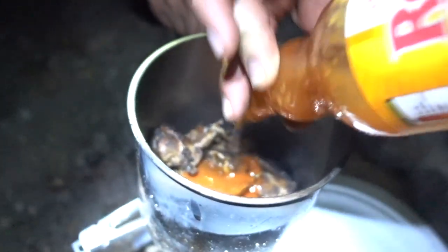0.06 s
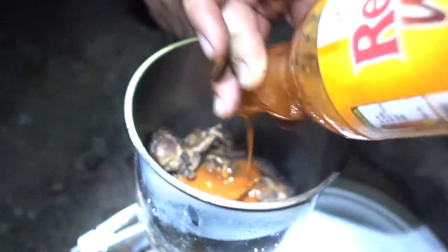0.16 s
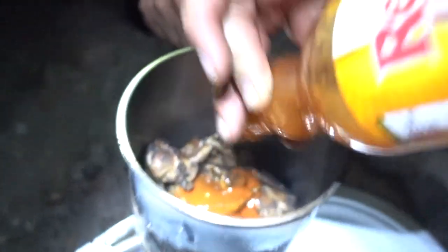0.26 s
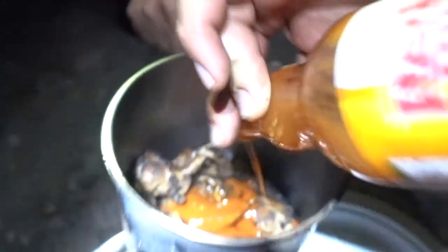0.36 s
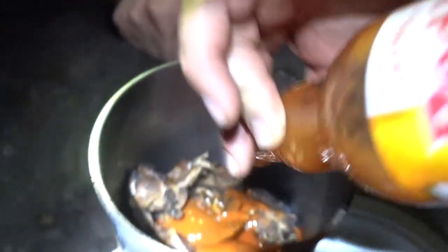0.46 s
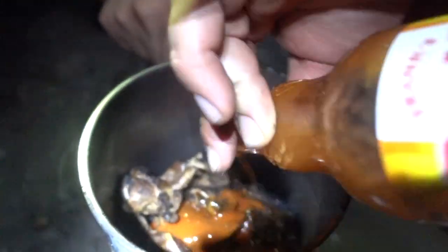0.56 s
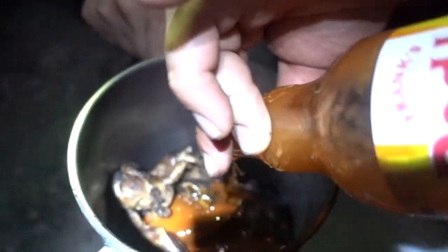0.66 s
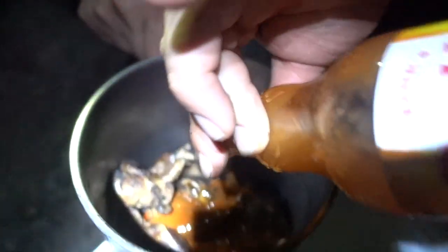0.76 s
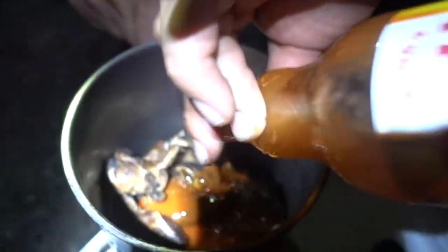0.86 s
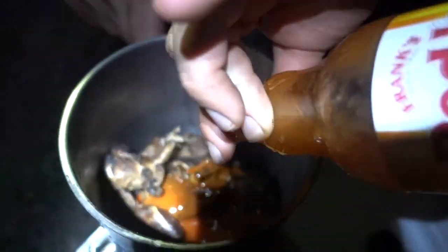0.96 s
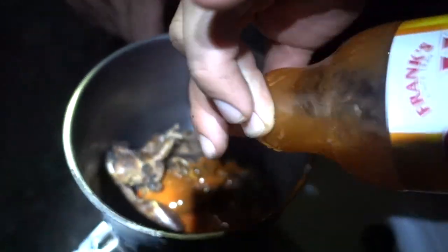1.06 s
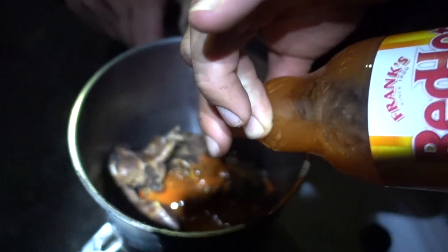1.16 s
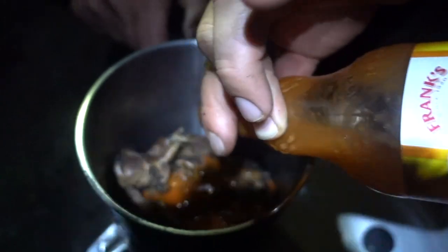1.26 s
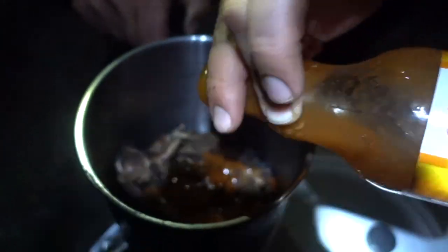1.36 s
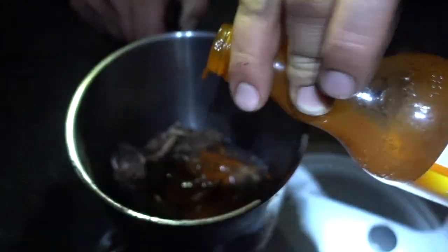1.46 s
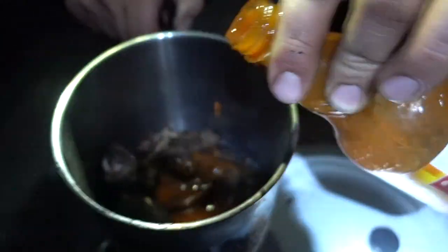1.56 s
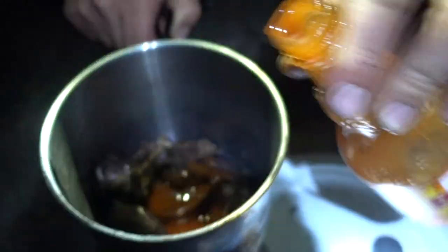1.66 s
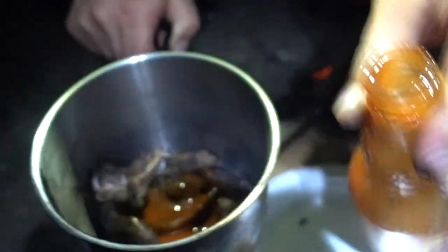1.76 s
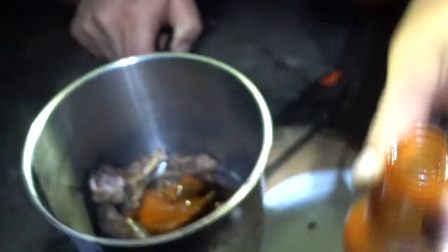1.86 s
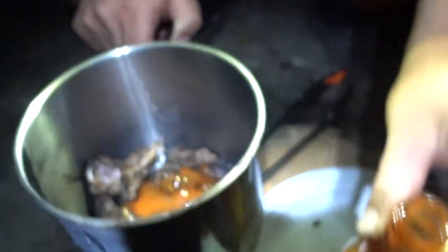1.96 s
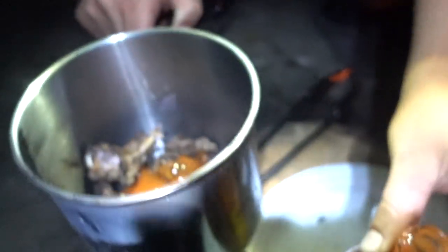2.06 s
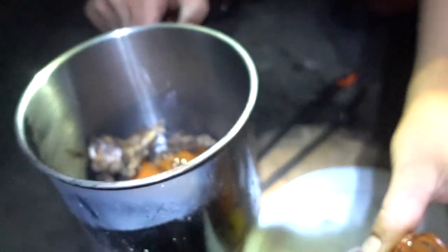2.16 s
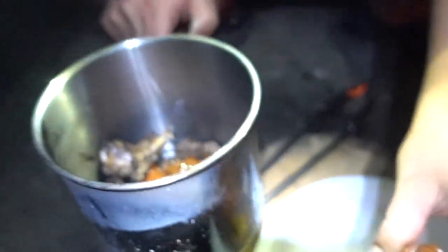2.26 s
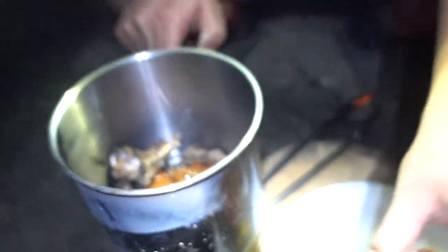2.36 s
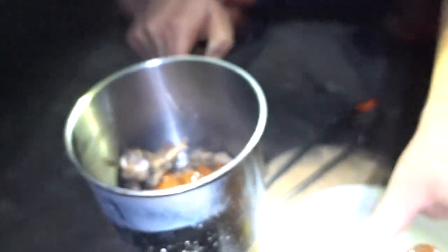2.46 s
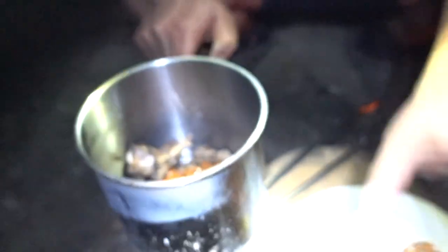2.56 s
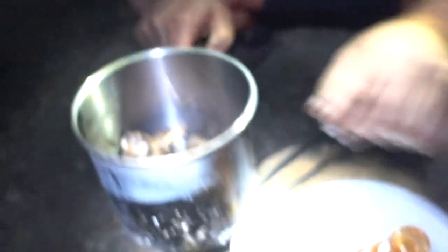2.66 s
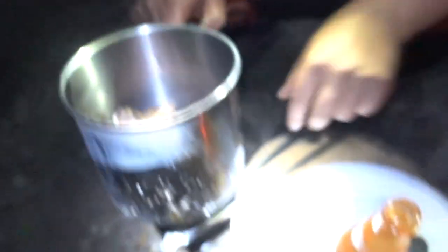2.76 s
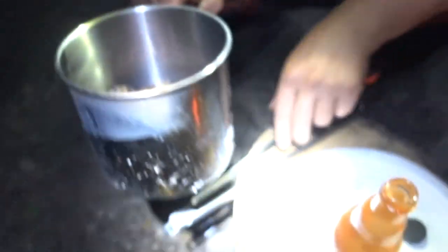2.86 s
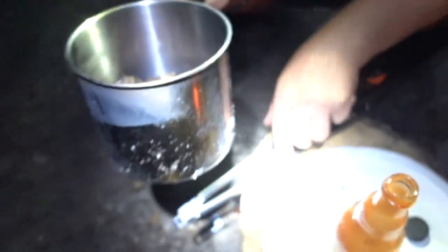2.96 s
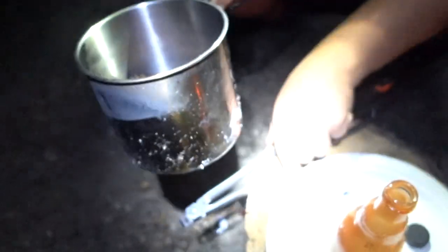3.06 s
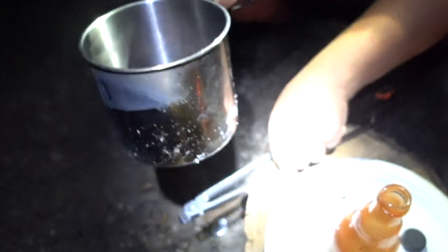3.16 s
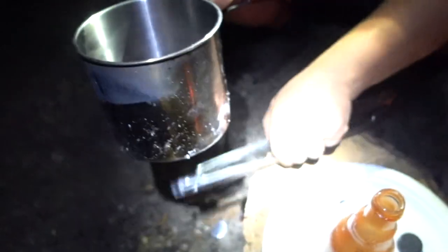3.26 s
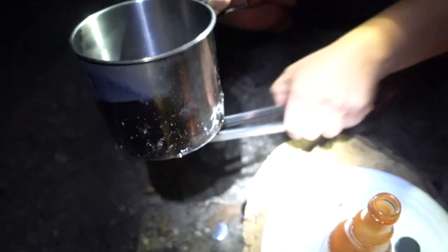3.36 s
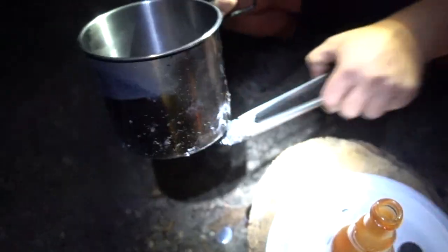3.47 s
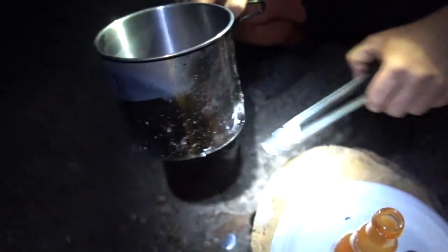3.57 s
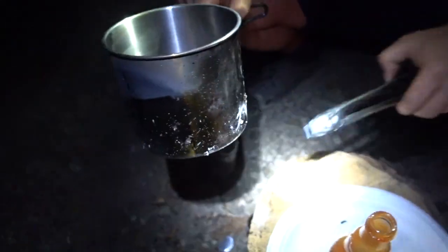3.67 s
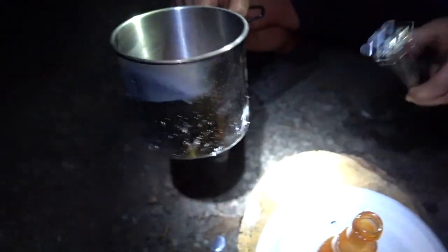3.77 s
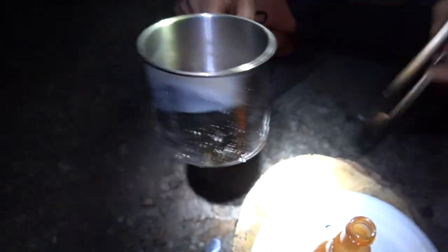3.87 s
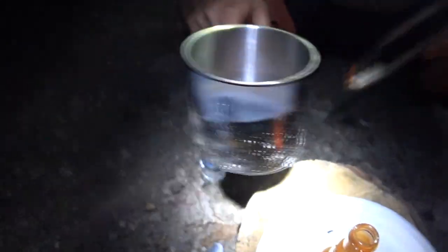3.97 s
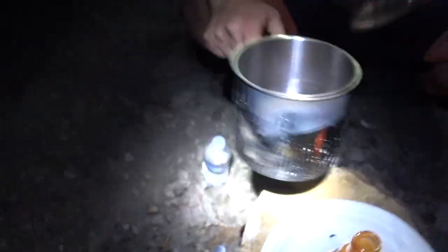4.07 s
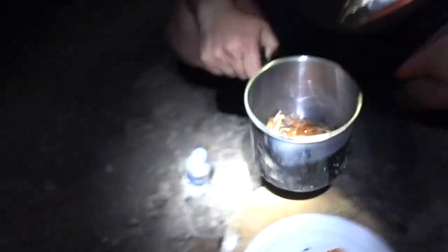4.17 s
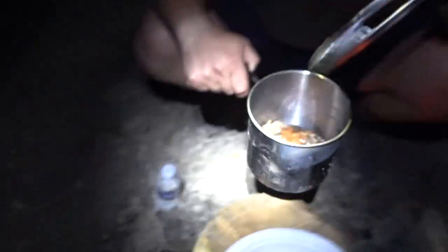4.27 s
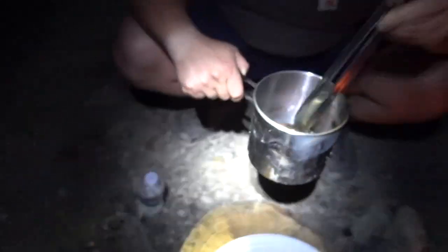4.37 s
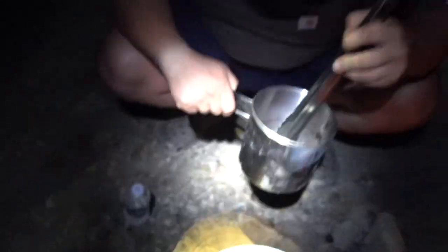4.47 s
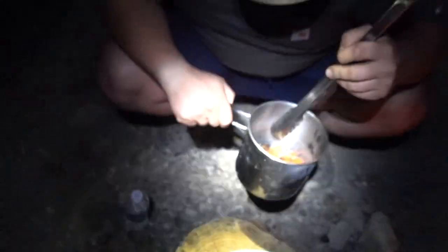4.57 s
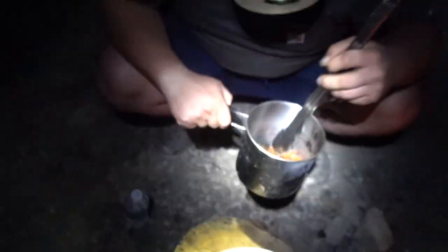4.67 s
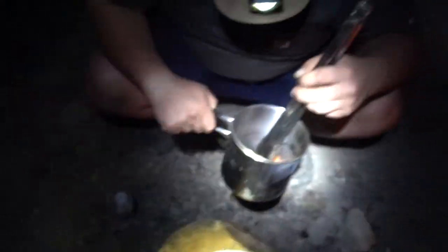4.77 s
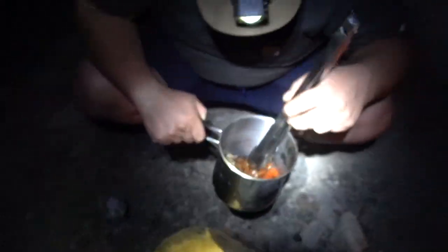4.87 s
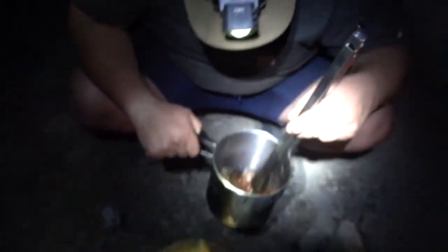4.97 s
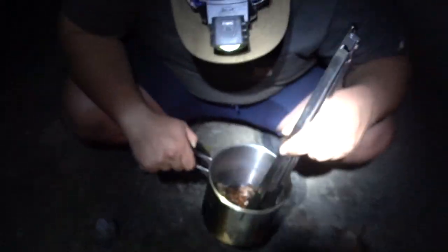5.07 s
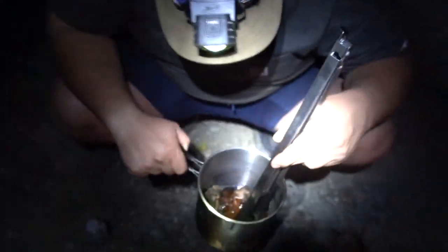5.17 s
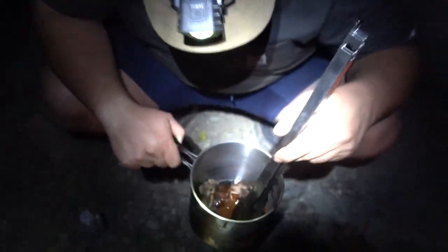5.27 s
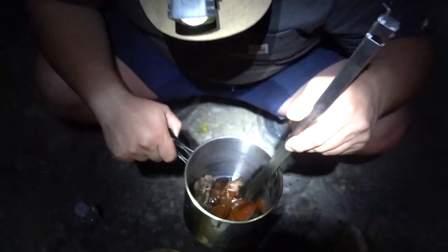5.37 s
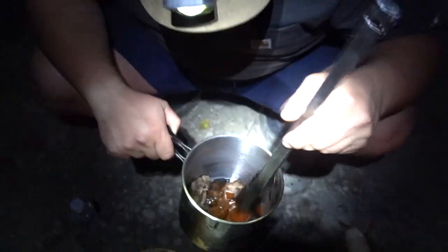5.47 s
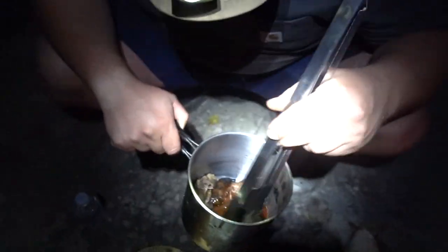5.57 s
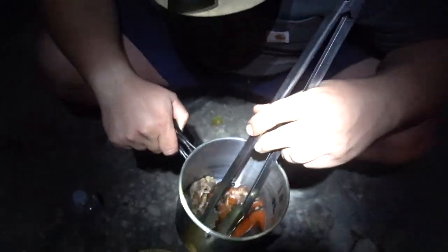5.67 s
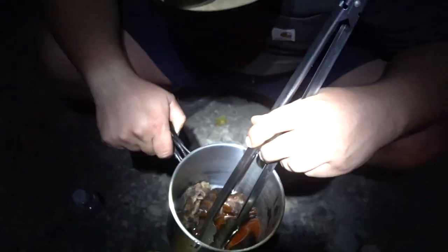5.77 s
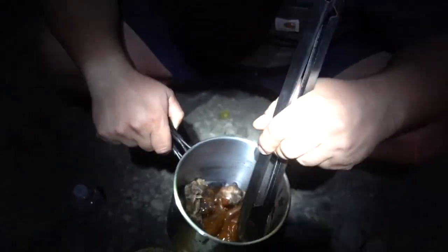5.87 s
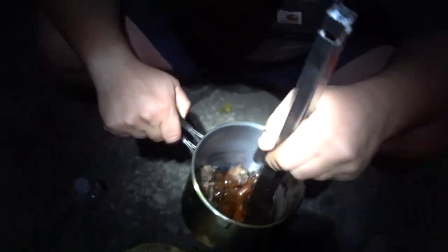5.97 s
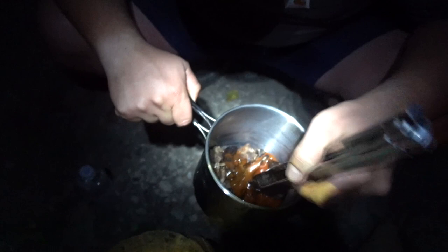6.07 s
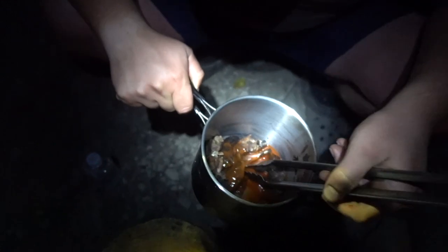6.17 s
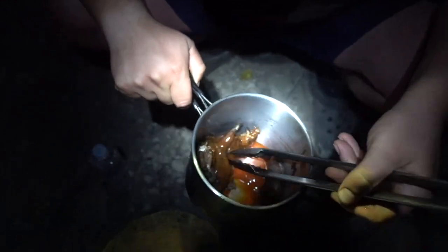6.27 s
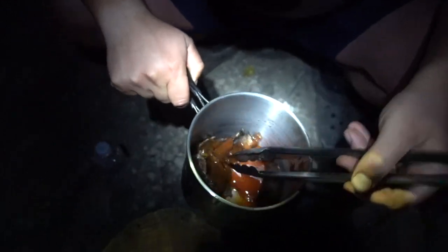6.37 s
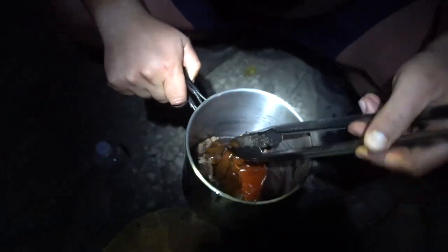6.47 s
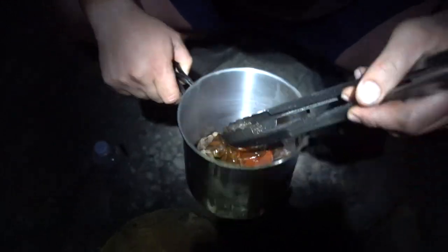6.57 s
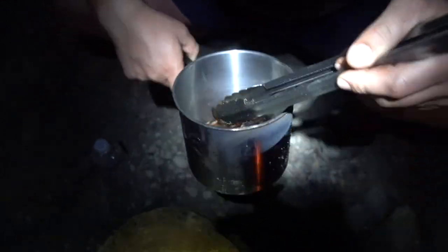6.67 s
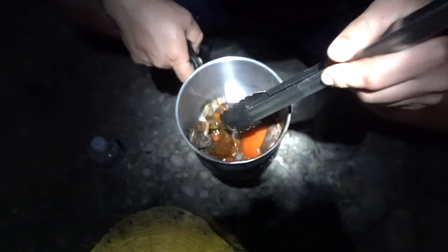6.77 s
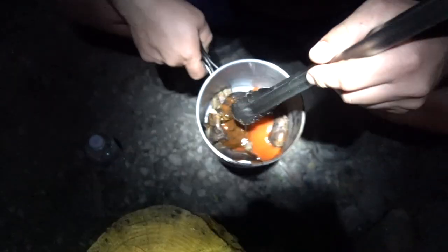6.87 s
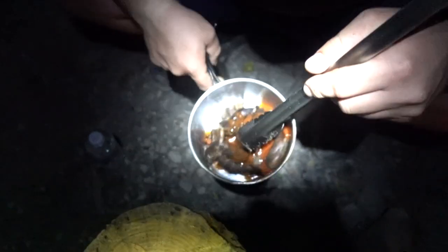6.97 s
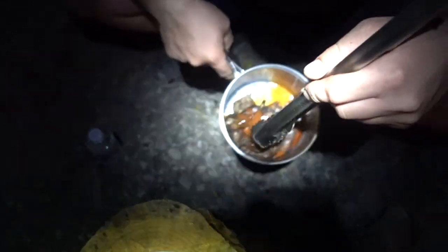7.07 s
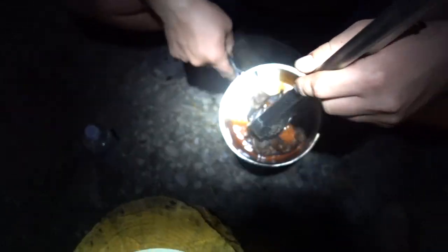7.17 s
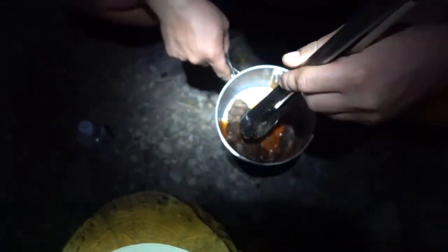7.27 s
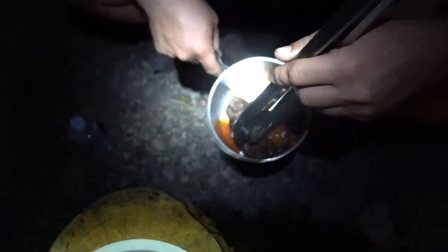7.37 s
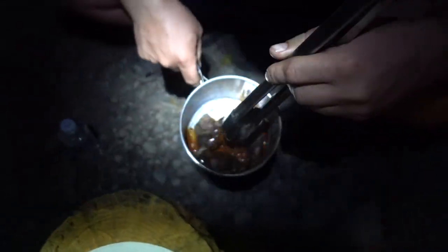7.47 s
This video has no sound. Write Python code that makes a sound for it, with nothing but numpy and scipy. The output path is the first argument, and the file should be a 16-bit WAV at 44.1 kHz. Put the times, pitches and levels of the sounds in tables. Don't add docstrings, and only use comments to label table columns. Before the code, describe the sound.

Crickets sing steadily at night as steel tongs knock, clink and scrape inside a small metal pot, with distant vehicles passing on a road.

```python
import sys
import numpy as np
from scipy import signal
from scipy.fft import rfft, irfft, next_fast_len
from scipy.io import wavfile
from scipy.ndimage import uniform_filter1d, map_coordinates

SR = 44100
rng = np.random.default_rng(int(sys.argv[2]) if len(sys.argv) > 2 else 0)


def how_loud(loudness_db):
    steps = np.asarray(loudness_db, float) / 20
    return 10 ** steps


def unload_audio(sound):
    columns = np.transpose(np.atleast_2d(sound))
    steps = np.round(np.clip(columns, -1, 1) * 32767)
    wavfile.write(sys.argv[1], SR, steps.astype(np.int16))


N = 331114


def along(points, hz):
    f, v = np.transpose(points)
    return np.interp(np.log(hz + 1), np.log(f + 1), v)


def unit(x):
    return x / np.sqrt(np.mean(x ** 2) + 1e-20)


def curves(rows):
    s, *columns = np.transpose(rows)
    return [np.interp(np.arange(N) / SR, s, column) for column in columns]


def sounding(rows):
    t = np.arange(N) / SR
    since_start = t - rows[0][0] + 0.01
    until_end = rows[-1][0] + 0.01 - t
    return np.clip(np.minimum(since_start, until_end) / 0.01, 0, 1)


def wobble(rate):
    steps = np.arange(0, N + 16, 16)
    knots = rng.standard_normal(int(N * rate / SR) + 4)
    return np.interp(np.arange(N), steps, map_coordinates(knots, [steps * rate / SR]))


def filtered(x, response):
    m = next_fast_len(N + SR // 2)
    return irfft(rfft(x, m) * response(np.fft.rfftfreq(m, 1 / SR)), m)[..., :N]


def resonant(x, peaks):
    def response(f):
        total = 0
        for k, (hz, width, db) in enumerate(peaks):
            total = total + (-1) ** k * how_loud(db) * 1j * f * width / (hz * hz - f * f + 1j * f * width)
        return total
    return filtered(x, response)


def rush(spectrum, patchy_db):
    z = signal.stft(rng.standard_normal((2, N)), nperseg=512)[2]
    field = uniform_filter1d(rng.standard_normal(z.shape[1:]), size=4, axis=0)
    field = uniform_filter1d(field, size=12, axis=1)
    pair = signal.istft(z * how_loud(patchy_db * unit(field)), nperseg=512)[1][:, :N]
    return unit(filtered(pair, lambda hz: how_loud(along(spectrum, hz))))


def grains(rate, spread_db, channels=1):
    shape = (channels, N)
    clicks = (rng.random(shape) < rate / SR) * rng.standard_normal(shape)
    return unit(clicks * how_loud(spread_db * rng.standard_normal(shape)))


def tone(rows, orders, rough, shake_db):
    hz, db = curves(rows)
    turns = 2 * np.pi * np.cumsum(hz) / SR
    wave = 0
    for multiple, level_db in orders:
        wave = wave + how_loud(level_db + shake_db * wobble(14)) * np.sin(multiple * turns + rough * wobble(40))
    return np.sqrt(2) * how_loud(db) * sounding(rows) * wave


def rings(rows, partner_hz, partner, rise, noisy):
    out = np.zeros(N + SR)
    t = np.arange(SR // 2) / SR
    for s, db, hz, t60, *held in rows:
        rattle = np.cumsum(0.05 * rng.standard_normal(len(t)))
        pair = np.sin(2 * np.pi * hz * t + rattle)
        pair = pair + partner * np.sin(2 * np.pi * (hz - partner_hz) * t)
        scratch = noisy * rng.standard_normal(len(t)) * how_loud(-60 * t / 0.001)
        grip = how_loud(-60 * np.clip(t - held[0], 0, 1) / 0.055) if held else 1
        fade = how_loud(db - 60 * t / max(t60, 0.003)) * (1 - np.exp(-t / rise))
        out[round(s * SR):][:len(t)] += fade * grip * (pair + scratch)
    return out[:N]


# pitch_hz, likeness_0_to_1
EAR_LIKENESS = [(60, 1.0), (150, 1), (380, 0.86), (950, 0.52), (2380, 0.62), (5980, 0), (15000, 0)]
# pitch_hz, left_minus_right_db
LEFT_TILT = [(60, 1), (180, 0.3), (550, 2.5), (1650, 3), (4970, 2.5), (15000, -0.5)]


def surround(pair):
    def turn(hz):
        return np.arccos(np.clip(along(EAR_LIKENESS, hz), 0, 1)) / 2
    mid, side = filtered(pair, lambda hz: np.array([np.cos(turn(hz)), np.sin(turn(hz))]))
    ears = np.array([mid + side, mid - side])
    return filtered(ears, lambda hz: how_loud(np.outer([0.5, -0.5], along(LEFT_TILT, hz))))


# pitch_hz, level_db
AIR_COLOUR = [(3600, -8), (4600, -17), (6400, -1), (7500, -4), (7800, -13.5), (12000, -11), (13300, -27),
              (15500, -53)]


def air():
    return surround(how_loud(-55.5) * rush(AIR_COLOUR, patchy_db=-1.5))


# time_s, pitch_hz, level_db
CAR_ENGINE = [
    (0, 107.3, -59.5),
    (.3, 111.3, -63.5),
    (.55, 110.6, -79),
    (.9, 101.8, -70.5),
    (1.15, 92.5, -69),
    (1.4, 86.5, -100),
]
# time_s, pitch_hz, level_db
TRUCK_ENGINE = [
    (2.5, 48.5, -86),
    (2.8, 49.5, -77),
    (3.3, 51, -77),
    (3.8, 52.9, -72),
    (4.15, 53.8, -76),
    (4.5, 55, -86),
]
# multiple_of_firing, level_db
CAR_OVERTONES = [(0.995, 3), (2.002, 0), (2.997, -2.5), (5.601, -2.5)]
TRUCK_OVERTONES = [(1, 7), (2, 4.5), (4, 5.5)]
# time_s, pitch_hz, level_db
TREAD_WHINE = [(0.2, 1344, -62), (.6, 1290, -50.5), (.9, 1075, -56.5), (2.1, 1027, -59)]
# time_s, level_db
ROAR_SWELL = [(0, -51), (.4, -51), (.65, -48.5), (.9, -52.5), (1.3, -50.5), (1.9, -57), (2.4, -55),
              (2.9, -51.5), (3.7, -53), (4.2, -53.5), (5.4, -54.5), (6.5, -54), (7.51, -51.5)]
# pitch_hz, level_db
ROAR_COLOUR = [(400, -120), (450, -5), (600, -1.5), (800, -4.5), (1150, 1.5), (1500, -3), (1800, -7),
               (1900, -120)]
RUMBLE_COLOUR = [(25, -15), (60, -22), (130, -8), (250, -5), (450, -7.5), (520, -120)]
HISS_COLOUR = [(1600, -120), (1700, -5), (2300, -1), (2800, 0), (3800, -3.5), (4300, -9), (5000, -120)]


def road():
    roar_db, = curves(ROAR_SWELL)
    swing_db = 1.03 * (roar_db - roar_db.mean())
    rumble = how_loud(-64.5 + swing_db)
    rumble = rumble + how_loud(-8 + curves(CAR_ENGINE)[1])
    rumble = rumble + how_loud(4 + curves(TRUCK_ENGINE)[1]) * sounding(TRUCK_ENGINE)
    car = tone(CAR_ENGINE, CAR_OVERTONES, rough=0.29, shake_db=2.5)
    truck = tone(TRUCK_ENGINE, TRUCK_OVERTONES, rough=0.28, shake_db=-1.0)
    tread = tone(TREAD_WHINE, [(1, 0)], rough=2, shake_db=2) * wobble(220)
    roar = how_loud(roar_db) * rush(ROAR_COLOUR, patchy_db=1.0)
    hiss = how_loud(-56 + swing_db) * rush(HISS_COLOUR, patchy_db=2.5)
    far = surround(roar + hiss + rumble * rush(RUMBLE_COLOUR, patchy_db=4.0))
    return far + car + truck + tread * how_loud([[0.8], [-0.8]])


# time_s, level_db
LOW_SINGERS = [(0, -56), (1.2, -49.5), (3, -51), (5.3, -50.5), (7.51, -48)]
# time_s, level_db
FAINT_SINGER = [(0, -64.5), (1, -57.5), (2.6, -65), (3.2, -69)]
# start_s, end_s, pitch_hz, level_db
NEAR_TRILLS = [
    (0.415, 0.57, 5610, -49.5),
    (0.897, 1.163, 5460, -49.5),
    (1.413, 1.594, 5710, -52.5),
    (2.152, 2.381, 5480, -47),
    (2.595, 2.87, 5550, -51.5),
    (3.791, 4.054, 5475, -45),
    (5.075, 5.31, 5530, -45),
]


def crickets():
    low_db, = curves(LOW_SINGERS)
    high_db = -47.5 + 0.27 * (low_db - low_db.mean())
    low = resonant(grains(6000, spread_db=1.5, channels=2), [(3016, 146, -0.46), (3380, 144, -0.54)])
    low = unit(resonant(low, [(3200, 1500, 0)]))
    high = resonant(grains(6000, spread_db=-0.5, channels=2), [(5250, 940, -0.5), (5950, 480, -3)])
    high = unit(resonant(high, [(5775, 660, 0)]))
    faint = resonant(grains(6000, spread_db=-2, channels=2), [(2575, 120, 0)])
    faint = unit(resonant(faint, [(2575, 500, 0)]))
    far = how_loud(low_db + 0.49 * wobble(45)) * low + how_loud(high_db + 0.18 * wobble(55)) * high
    far = far + how_loud(curves(FAINT_SINGER)[0] + 1.5 * wobble(29.6)) * sounding(FAINT_SINGER) * faint
    beat = np.sin(2 * np.pi * np.cumsum(85 + 15 * wobble(20)) / SR)
    strokes = unit((beat + 2.2) * how_loud(3 * wobble(160)))
    drift = 2 * np.pi * np.cumsum(30 * wobble(25)) / SR + 0.9 * wobble(220)
    near = np.zeros(N)
    for start, end, hz, db in NEAR_TRILLS:
        whistle = np.sin(2 * np.pi * hz * np.arange(N) / SR + drift)
        near += np.sqrt(2) * how_loud(db) * sounding([[start], [end]]) * whistle
    return surround(far) + near * strokes * how_loud([[1.5], [-1.5]])


# time_s, peak_db, body_db, edge_db, ring_s (time to fade 60 dB)
POT_BLOWS = [(4.4548, -21.5, -31, 0, 0.052), (4.5985, -6, -19, -14, 0.04), (4.6085, -11, -16.5, -17, 0.082),
             (4.7056, -19, -38, -14, 0.044), (4.716, -22, -17, -18, 0.093),
             (4.9788, -7.5, -18.5, -8.5, 0.036), (4.9835, -3.5, -24, -30, 0.021),
             (4.991, -10.5, -21, -20, .04), (4.996, -11, -25, -23, 0.028), (5.012, -21, -24, -25, .03),
             (5.0704, -12.5, -32, -5.5, 0.036), (5.5555, -9, -21, -17.5, 0.033),
             (5.561, -14, -24.5, -21, 0.037), (5.6354, -17, -15, -15.5, 0.041),
             (5.9303, -18.5, -17, -13, 0.027), (6.0274, -12.5, -8, -19.5, 0.046),
             (6.2009, -9.5, -18, -13, 0.029), (6.6796, -5.5, -22.5, -17.5, 0.03),
             (6.6832, -15, -26, -14, 0.066), (6.7944, -9.5, -24.5, -21.5, 0.014),
             (7.042, -20.5, -58, -12, 0.079), (7.3026, -19.5, -14.5, -14, 0.03),
             (7.3208, -16, -15, -8.5, 0.02), (7.4355, -18, -15.5, -13.5, 0.019)]
# time_s, peak_db, body_db, edge_db
LIGHT_TAPS = [(0.661, -19, -20, -35), (0.859, -22, -18, -12.5), (3.0591, -22, -11, -21),
              (3.928, -31, -7, -27), (3.949, -34, -3, -31), (4.146, -30, -1, -25), (4.241, -40, -17, -20),
              (4.119, -28, -1, -17), (5.031, -24, -7, -30), (6.557, -28, -18, -17), (6.976, -25.5, -24, -8),
              (7.141, -33, -20, -5), (7.342, -24, -16, -12), (7.425, -26, -20, -10)]
# time_s, peak_db, edge_db, ring_s
GROUND_HITS = [
    (2.1341, -27.5, -29, 0.038),
    (2.139, -21.5, -28, 0.024),
    (3.388, -8, -14, 0.03),
    (3.4077, -11.5, -15, 0.025),
    (3.429, -24, -28, 0.097),
    (3.478, -27, -17, 0.032),
]
# pitch_hz, level_db, ring_s
STEEL_MODES = [(438, 0.5, 0.17), (565, 5, 0.16), (904, 2, 0.16), (1457, 12, 0.077), (2330, -25, 0.023),
               (2654, -5.5, 0.52), (2940, 3.5, 0.14), (3530, 8.5, 0.023),
               (3920, 3, 0.084), (4460, -8, 0.036), (5180, 11, 0.054), (5960, 3, 0.088), (5960, -3, 0.036),
               (7640, -5, 0.022), (7000, -7, 0.033), (8650, -7, .035)]


def knocks():
    out = np.zeros(N + SR)
    t = np.arange(SR // 4) / SR
    hz, level, ring = np.transpose(STEEL_MODES)[:, :, None]
    grid = np.fft.rfftfreq(len(t), 1 / SR)
    contacts = POT_BLOWS + [(*tap, 0.012) for tap in LIGHT_TAPS]
    contacts = contacts + [(s, db, -10, edge_db, t60) for s, db, edge_db, t60 in GROUND_HITS]
    for s, db, body_db, edge_db, t60 in contacts:
        cavity_db, wall_db = body_db - 6.5, body_db + 4.5
        colour = [(180, cavity_db - 10), (500, cavity_db + 17.0), (1400, wall_db + 4.5),
                  (2300, -3.0), (4500, -1.0), (6500, -6.0),
                  (9000, edge_db + 2.0), (12500, edge_db - 6.0), (16000, edge_db - 40)]
        shape = how_loud(along(colour, grid))
        t60 = np.clip(t60, 0.004, 0.2)
        strength = level + along(colour, hz) + 2 * rng.standard_normal(hz.shape)
        tuned = hz * (1 + 0.0068 * rng.standard_normal(hz.shape))
        modes = how_loud(strength - 60 * t / (ring * t60 / 0.073)) * np.sin(2 * np.pi * tuned * t)
        clatter = unit(irfft(rfft(rng.standard_normal(len(t))) * shape, len(t)))
        clatter *= how_loud(np.max([cavity_db, wall_db, 0]) / 2)
        clatter *= how_loud(-60 * t / (1.27 * t60)) + 1.56 * how_loud(-60 * t / 0.0072)
        blow = (0.12 * modes.sum(0) + 0.58 * clatter) * (1 - np.exp(-t / 0.00062))
        out[round(s * SR):][:len(t)] += how_loud(db - 7.5) * blow
        crack = np.roll(irfft(shape, len(t)), 24) * (t < 0.002)
        out[round(s * SR) - 8:][:len(t)] += how_loud(db - 9.5) * crack / np.abs(crack).max()
    return out[:N]


def ground(x):
    t = np.arange(SR // 8) / SR
    tail = rng.standard_normal((2, len(t))) * how_loud(-60 * t / 0.045)
    tail = tail / np.linalg.norm(tail, axis=1, keepdims=True)
    echo = signal.fftconvolve(x[None], tail, axes=1)[:, :N]
    colour = [(150, -28), (500, -7), (1300, -1.0), (5000, 3.0), (12000, 8.0)]
    return filtered(echo, lambda hz: how_loud(along(colour, hz)))


# time_s, peak_db, pitch_hz
TICKS_AND_POPS = [(1.425, -40.5, 2253), (1.5364, -36, 8540), (1.627, -39, 938), (2.507, -42, 1040),
                  (2.706, -31, 1290), (2.94, -39, 920), (2.997, -39, 1150), (3.927, -40, 1450),
                  (4.095, -41.5, 870), (4.8556, -39, 3870), (4.906, -35, 1480), (4.913, -33, 1450),
                  (4.936, -35, 1380), (4.947, -35, 1250), (4.959, -26.5, 1460), (5.034, -34, 1290),
                  (5.123, -38, 1390), (5.14, -41, 1310), (5.088, -30.5, 1120), (5.185, -35, 1340),
                  (5.8065, -34, 3170), (5.81, -33, 3200), (5.827, -35, 3000), (5.838, -35, 3040),
                  (6.437, -41.5, 690), (6.432, -41, 840), (6.7944, -20, 3450), (6.873, -35, 1104),
                  (7.009, -36.5, 2600), (4.242, -40, 4460), (4.461, -32, 1130), (4.481, -40, 1130),
                  (4.502, -32, 1100), (4.516, -32, 1140), (4.524, -33, 1200), (6.484, -39.5, 1800)]


def ticks():
    rows = [(s, db, hz, 0.026 * (1000 / hz) ** 0.97) for s, db, hz in TICKS_AND_POPS]
    return how_loud(5.0) * rings(rows, partner_hz=308, partner=0.22, rise=0.00011, noisy=0.33)


# time_s, pitch_hz, level_db
LOWER_VOICE = [
    (2.69, 4709, -57),
    (2.706, 4790, -44),
    (2.758, 4572, -46),
    (2.812, 4223, -62),
    (2.88, 4221, -62),
    (2.934, 4588, -47),
    (2.962, 4644, -45),
    (3.0, 4442, -52),
    (3.05, 4055, -65),
]
# time_s, pitch_hz, level_db
UPPER_VOICE = [(2.63, 7250, -70), (2.69, 9300, -73), (2.79, 8000, -67), (2.93, 7800, -68),
               (3.02, 7600, -78)]


def bird():
    lower = tone(LOWER_VOICE, [(1, 0)], rough=0.5, shake_db=1) * how_loud(2 * wobble(60) - 2.5)
    upper = tone(UPPER_VOICE, [(1, 0)], rough=1.6, shake_db=3) * how_loud(-3)
    song = lower + upper
    return np.array([how_loud(1.2) * song, how_loud(-1.2) * np.roll(song, 2)])


# time_s, level_db, pitch_hz, ring_s
FAVOURED_TONES = [(4.455, -24.5, 4880, 0.04), (4.526, -31.5, 5800, 0.052), (4.61, -21.5, 2880, 0.097),
                  (4.706, -21.5, 6150, 0.048), (4.718, -37, 1461, 0.1), (4.98, -13, 3200, 0.054),
                  (5.071, -14.5, 5890, 0.026), (5.555, -23.5, 545, 0.076), (5.555, -19, 1472, 0.038),
                  (5.64, -27, 556, 0.052), (5.765, -36.5, 569, 0.12), (6.028, -16.5, 1479, 0.07),
                  (6.028, -23.5, 534, 0.032), (6.201, -14.5, 2280, 0.048), (6.201, -8, 3480, 0.031),
                  (6.205, -28, 558, 0.087), (6.318, -25, 2330, 0.056), (6.682, -13.5, 5180, 0.031),
                  (6.685, -16.5, 3920, 0.066), (6.685, -24, 573, 0.071), (6.685, -31, 1420, 0.13),
                  (6.69, -31, 2970, 0.18), (6.795, -12.5, 2256, 0.022), (7.05, -37, 457, 0.17),
                  (7.32, -28.5, 386, 0.039), (5.866, -23, 1500, 0.039), (5.897, -24, 2350, 0.033),
                  (6.3, -35, 3155, 0.083), (6.354, -33, 2350, 0.048), (6.362, -33, 4790, 0.036),
                  (7.043, -26.5, 4300, 0.026), (7.055, -33, 2900, .05), (7.083, -20, 2830, 0.02),
                  (6.555, -25.5, 3290, 0.043), (7.072, -27, 2950, 0.027), (7.128, -34.5, 1510, .05),
                  (7.303, -27, 4030, 0.032), (7.321, -26, 7100, 0.025), (7.327, -23, 2860, 0.031),
                  (7.328, -29, 3950, .025), (7.425, -23, 2970, .03), (7.436, -22, 3200, 0.024),
                  (3.862, -46, 230, 0.11), (3.951, -40, 513, 0.15),
                  (3.408, -16.5, 2140, 0.026), (3.41, -27.5, 1437, .13), (3.41, -30.5, 623, 0.17),
                   (4.6, -30, 2440, 0.046), (4.6, -20, 4950, 0.062), (4.6, -28, 5405, .07),
                   (4.6, -30, 6360, 0.11), (4.6, -25, 7360, .035), (4.984, -22, 2200, .047),
                   (4.984, -28, 4900, 0.044), (4.983, -38, 6130, 0.23), (4.984, -35, 6573, 0.17),
                   (5.556, -34, 2660, 0.16), (5.557, -22.5, 2950, 0.097), (5.561, -23, 3870, 0.049),
                   (5.637, -31, 4000, 0.086), (5.665, -32, 3040, 0.044), (5.556, -29, 5650, .048),
                   (5.556, -27, 7310, 0.057), (6.027, -30, 2360, 0.071), (6.029, -35, 3000, 0.074),
                   (6.028, -25, 3400, 0.09), (6.028, -30, 4500, 0.048), (6.203, -17, 2930, 0.042),
                   (6.682, -14.5, 3114, 0.033), (6.689, -33, 2725, 0.18), (6.685, -31.5, 5870, 0.15),
                   (6.685, -44, 7100, .1), (6.795, -13.5, 2950, 0.018), (6.82, -36, 4150, 0.065),
                   (7.325, -32, 1500, 0.042), (7.437, -30, 1500, 0.049)]
# pitch_hz, level_db, ring_s
THUD_TONES = [(222, -22.5, 0.15), (445, -17.5, 0.094), (598, -13.5, 0.092), (845, -27, 0.17),
              (1437, -22.5, 0.11), (2144, -13, 0.026)]


def pot_rings():
    thud = [(3.389, db, hz, t60) for hz, db, t60 in THUD_TONES]
    rows = FAVOURED_TONES + thud
    return rings(rows, partner_hz=47.7, partner=0.012, rise=0.0019, noisy=0)


def stroke(start, hardest, end, db, fade_db):
    t = np.arange(0, N + 16, 16) / SR
    edges = np.clip(np.minimum(t - start + 0.01, end + 0.01 - t) / 0.01, 0, 1)
    ease = np.interp(t, [start, hardest, end], [1, 0, 1])
    pressure = edges * how_loud(db - fade_db * ease ** 1.8)
    return np.interp(np.arange(N) / SR, t, pressure)


# start_s, hardest_s, end_s, level_db, edge_db
WALL_SCRAPES = [(3.41, 3.425, 3.455, -39, -2.5), (3.44, 3.478, 3.48, -41, -4),
                (4.432, 4.442, 4.5, -44, -4.5), (4.723, 4.707, 5, -54, -8), (4.838, 4.986, 5.07, -39.5, -8),
                (5.013, 5.07, 5.27, -42.5, -7.5), (5.716, 5.766, 5.77, -40.5, -6.5),
                (5.815, 5.856, 5.89, -32, -7), (5.858, 5.876, 5.905, -24.5, -7),
                (5.87, 5.896, 5.932, -25.5, -9), (6.035, 6.04, 6.07, -31.5, -41),
                (6.085, 6.13, 6.21, -39, -14), (6.17, 6.23, 6.32, -38, -9.5), (6.26, 6.31, 6.33, -35, -8),
                (6.33, 6.36, 6.372, -41, -5), (6.38, 6.44, 6.9, -52.5, -5), (7.04, 7.062, 7.09, -35.5, -9),
                (7.06, 7.082, 7.115, -35.5, -12), (7.09, 7.11, 7.14, -43, -12),
                (7.115, 7.14, 7.17, -43, -10), (7.145, 7.183, 7.218, -40.5, -12),
                (7.31, 7.33, 7.355, -39, -12), (7.396, 7.408, 7.44, -42, -16),
                (7.415, 7.44, 7.47, -42, -14)]
# start_s, hardest_s, end_s, level_db
GRAVEL_DRAGS = [(3.467, 3.495, 3.53, -47.5), (3.917, 3.94, 4.14, -51.5), (4.04, 4.12, 4, -50),
                (4.46, 4.463, 4.53, -50), (4.494, 4.54, 4.61, -38), (4.62, 4.675, 4.7, -44),
                (4.69, 4.725, 5.4, -52), (4.89, 4.912, 5, -43.5), (4.932, 4.96, 4.98, -40),
                (5, 5.08, 5.21, -46.5), (5.89, 5.91, 7.7, -57), (6.428, 6.436, 6.2, -51)]
# pitch_hz, width_hz, level_db
WALL_MODES = [(510, 116, 10.5), (1500, 118, 5.5), (2350, 140, 1.5), (2740, 64, 1), (2950, 92, 5.5),
              (3200, 126, 1), (3920, 280, 4.5), (4660, 240, -4.5), (5260, 88, -10), (4200, 1570, -7.5)]
# pitch_hz, width_hz, level_db
GRAVEL_MODES = [(534, 630, 0.5), (1180, 280, 8), (1407, 110, 8), (2140, 1000, -1.5)]
# time_s, favoured_pitch_hz
TIP_SPOT = [(3.4, 2500), (3.52, 2800), (4.44, 4000), (4.9, 2960), (5.05, 3500), (5.3, 3000), (5.75, 3464),
            (5.83, 2830), (5.87, 4430), (5.91, 3450), (6.05, 2530), (6.19, 2350), (6.24, 3600),
            (6.33, 2820), (7.05, 2870), (7.13, 2300), (7.19, 2760), (7.42, 2820)]


def rubbing():
    slips = grains(7000, spread_db=2.3)[0] * how_loud(1.2 * wobble(150))
    grit = grains(2500, spread_db=3)[0] * how_loud(1.2 * wobble(90))
    hz = np.transpose(WALL_MODES)[0][:, None]
    steps = np.arange(0, N, 256)
    wander = unit(uniform_filter1d(rng.standard_normal((len(WALL_MODES), len(steps))), size=5, axis=1))
    octaves_away = np.abs(np.log2(hz / curves(TIP_SPOT)[0][steps]))
    gains = how_loud(1.6 * wander - 7 * octaves_away)
    gains /= np.sqrt(np.mean(gains ** 2, axis=0))
    wall = np.zeros(N)
    for k, (gain, mode) in enumerate(zip(gains, WALL_MODES)):
        wall += (-1) ** k * np.interp(np.arange(N), steps, gain) * resonant(slips, [mode])
    base = resonant(resonant(grit, GRAVEL_MODES), [(1290, 1600, 0)])
    edge = resonant(resonant(slips, [(6000, 3300, 0)]), [(7000, 5700, 0)])
    edge = filtered(edge, lambda f: 1 / (1 + (f / 13800) ** 8))
    wall, base, edge = unit(wall), unit(base), unit(edge)
    scrapes = np.zeros(N)
    for *row, edge_db in WALL_SCRAPES:
        scrapes += stroke(*row, fade_db=19.5) * (wall + how_loud(edge_db) * edge + how_loud(-24.5) * base)
    drags = sum(stroke(*row, fade_db=10.5) for row in GRAVEL_DRAGS)
    return scrapes + drags * (base + how_loud(-34) * wall + how_loud(-24) * edge)


# time_s, level_db, pitch_hz, free_for_s
ARM_CHIMES = [
    (3.415, -43, 4180, 0.04),
    (3.47, -51, 3960, 0.082),
    (3.812, -50.5, 3950, .11),
    (4.63, -36, 4060, 0.062),
    (4.987, -33.5, 4020, .18),
    (5.072, -37, 4080, 0.028),
    (5.74, -48, 3960, 0.048),
    (6.22, -40.5, 4060, 0.075),
]


def tongs_rings():
    rows = [(s, db, hz, 0.47, held) for s, db, hz, held in ARM_CHIMES]
    chime = rings(rows, partner_hz=70, partner=0.8, rise=0.0018, noisy=0)
    return chime * how_loud(1.2 * wobble(90))


def scene():
    night = air() + road() + crickets() + bird()
    steel = knocks() + ticks() + pot_rings() + rubbing() + tongs_rings()
    steel = filtered(steel, lambda hz: (1j * hz / (170 + 1j * hz)) ** 3)
    return steel * how_loud([[0.4], [-0.4]]) + how_loud(-8.5) * ground(steel) + night


def faint_part(x, low_hz, high_hz, least_db):
    band = filtered(x, lambda hz: (hz > low_hz) & (hz < high_hz))
    level = np.sqrt(np.abs(uniform_filter1d(band[0] ** 2, size=2048)))
    too_faint = 1.0 * (level < how_loud(least_db + 2.5 * wobble(25)))
    return band * uniform_filter1d(too_faint, size=400)


def low_pass(x):
    return signal.sosfilt(signal.butter(12, 16480, fs=SR, output="sos"), x)


def record(dry):
    heard = filtered(dry, lambda hz: (1j * hz / (60 + 1j * hz)) ** 2 * (hz < 15900))
    heard = heard / (1 + np.abs(heard / 0.7) ** 4) ** 0.25
    heard = filtered(heard, lambda hz: hz < 15900)
    return low_pass(heard)


dry = scene()
out = record(dry)
unload_audio(out)
```